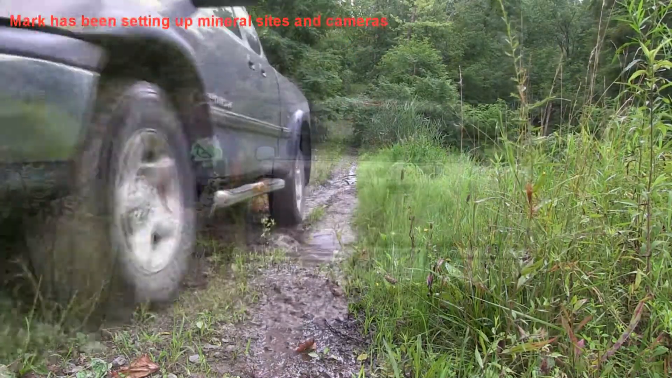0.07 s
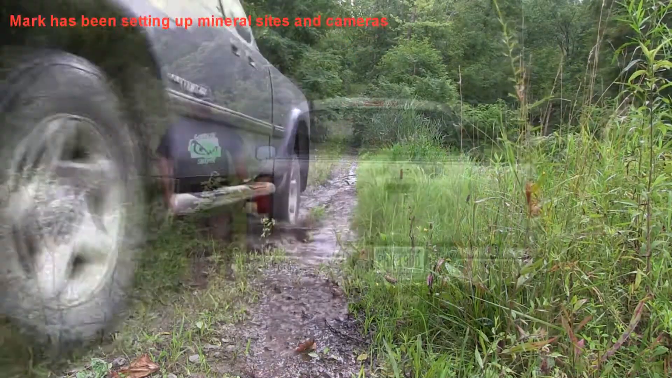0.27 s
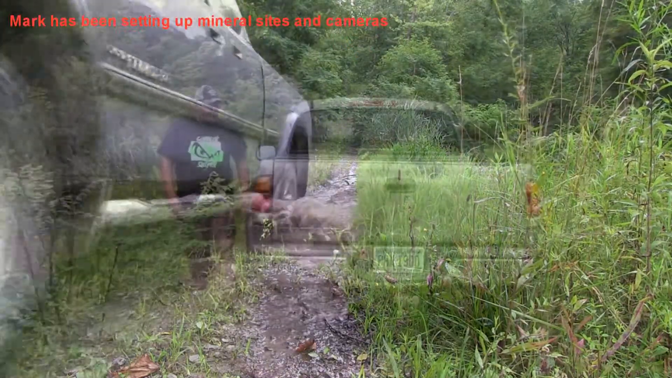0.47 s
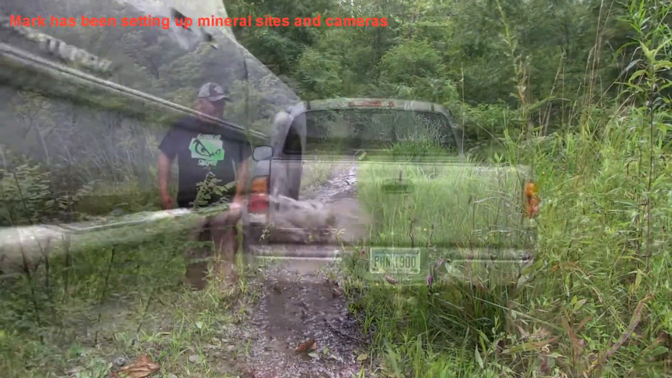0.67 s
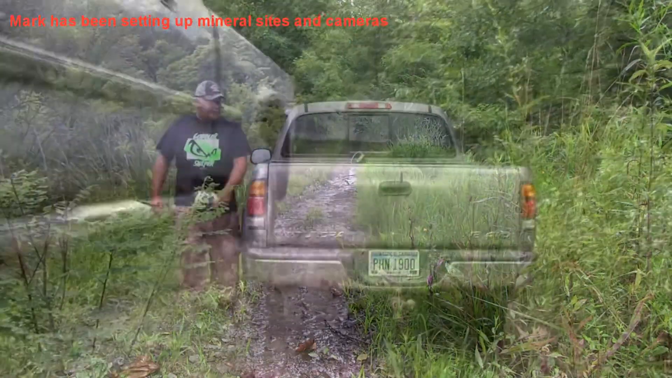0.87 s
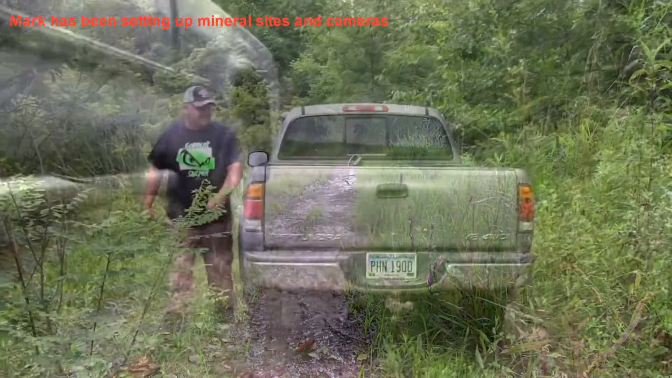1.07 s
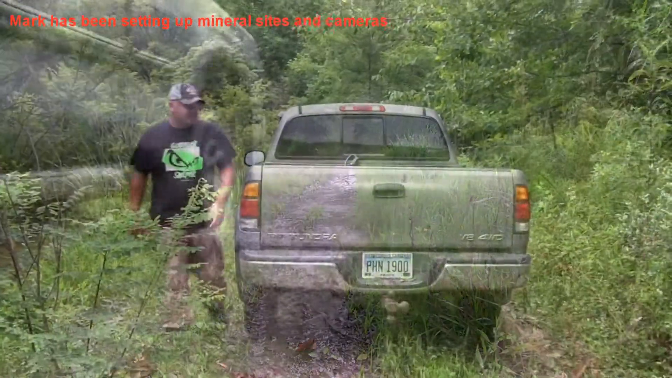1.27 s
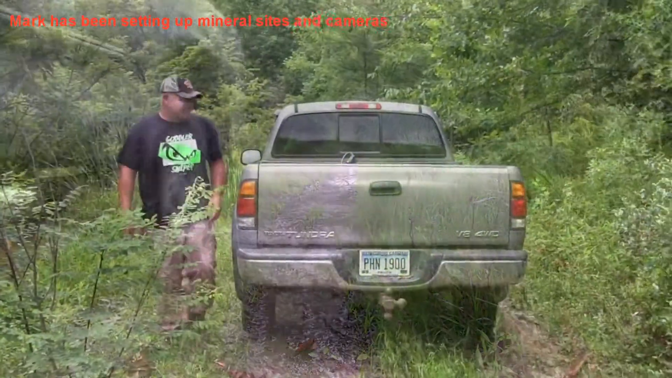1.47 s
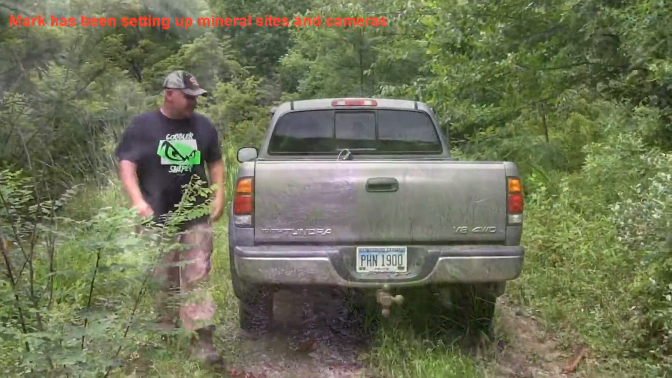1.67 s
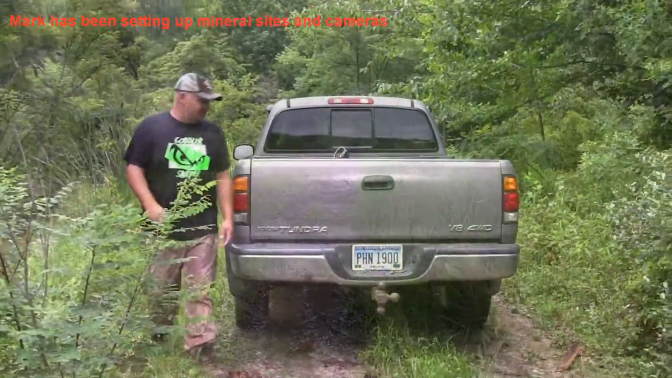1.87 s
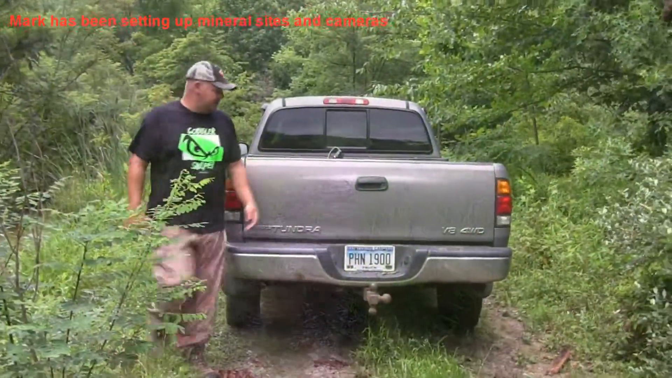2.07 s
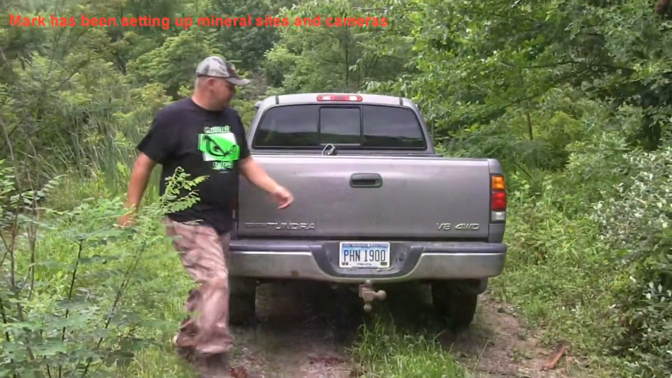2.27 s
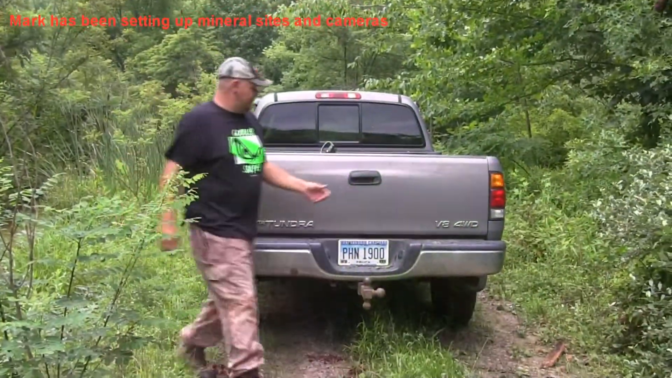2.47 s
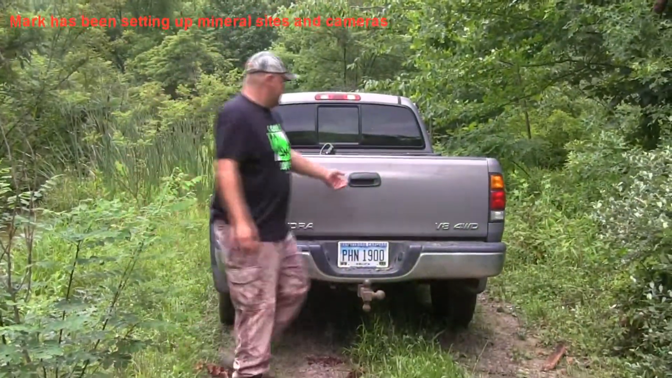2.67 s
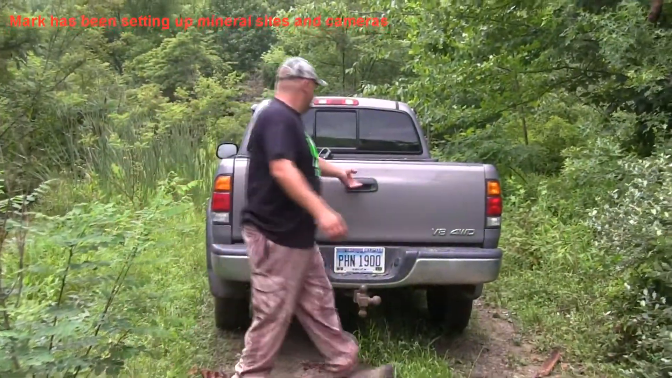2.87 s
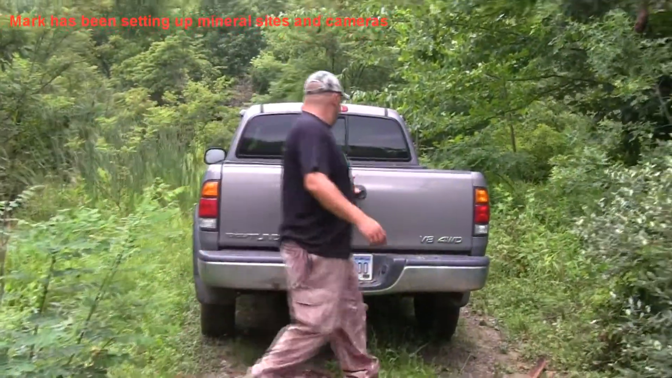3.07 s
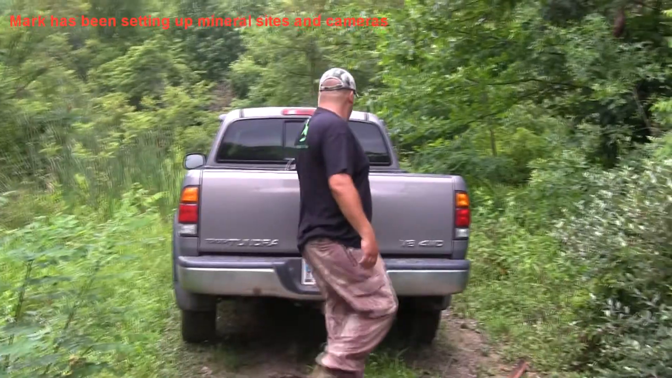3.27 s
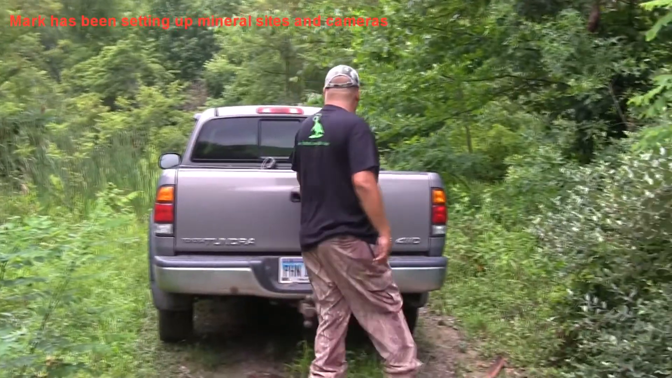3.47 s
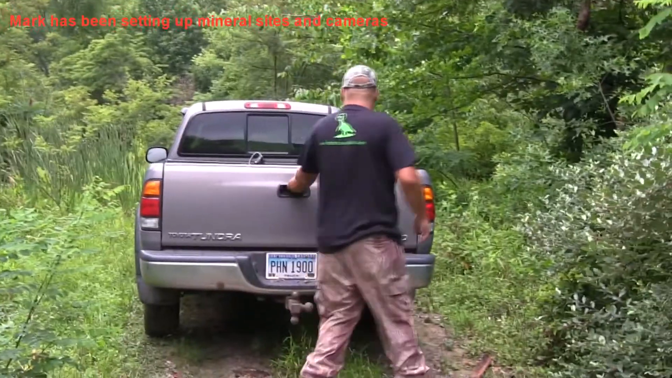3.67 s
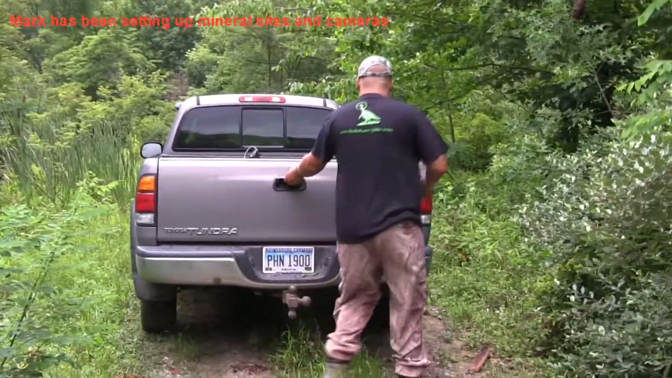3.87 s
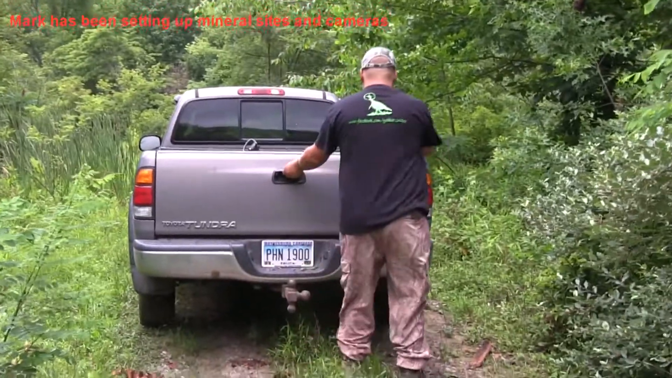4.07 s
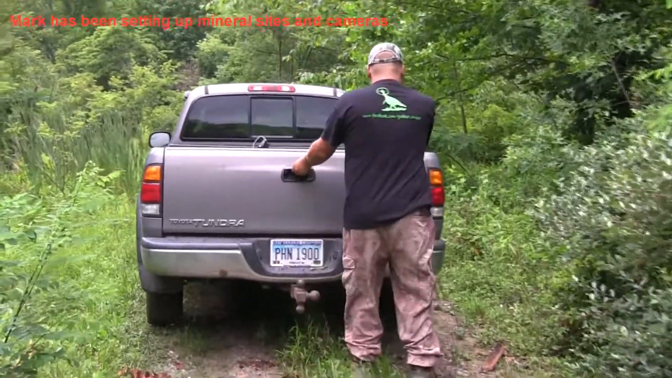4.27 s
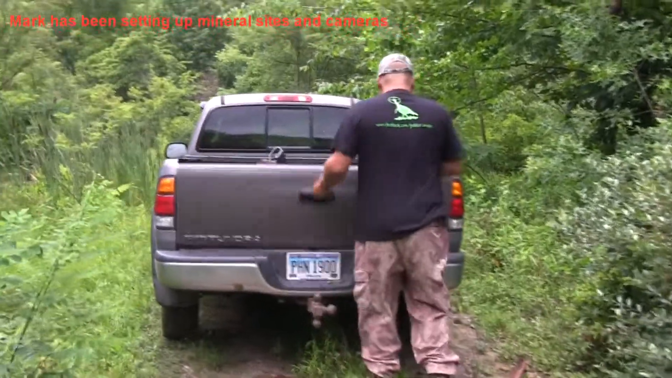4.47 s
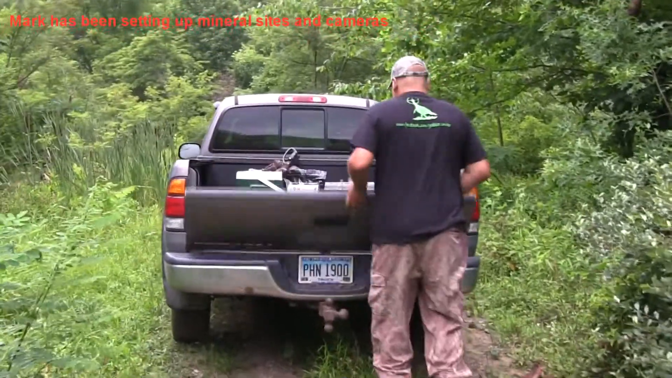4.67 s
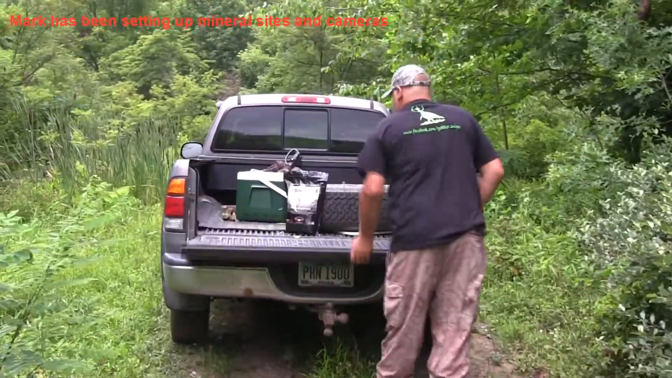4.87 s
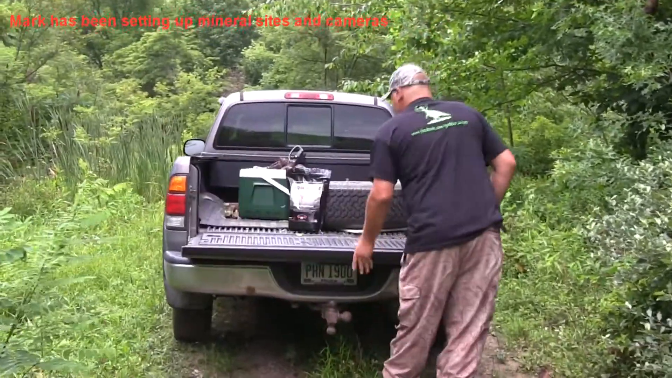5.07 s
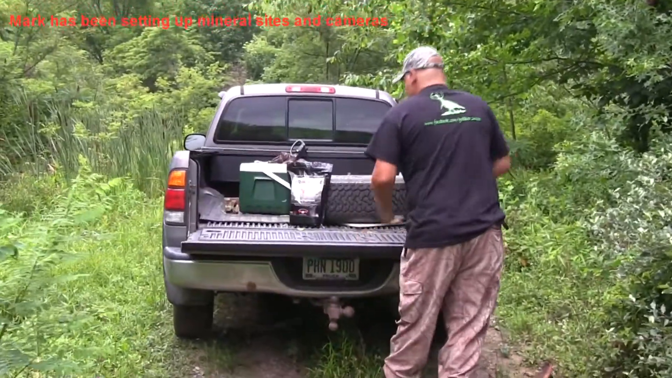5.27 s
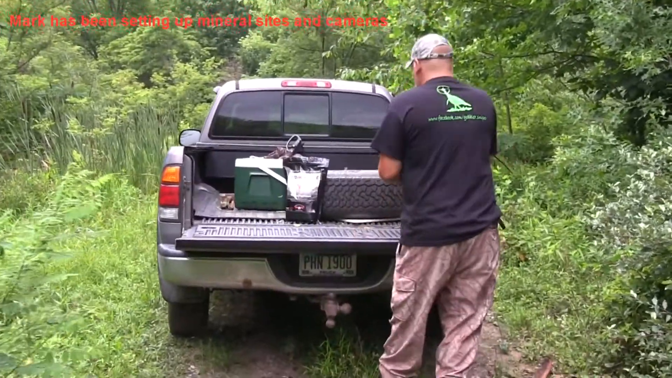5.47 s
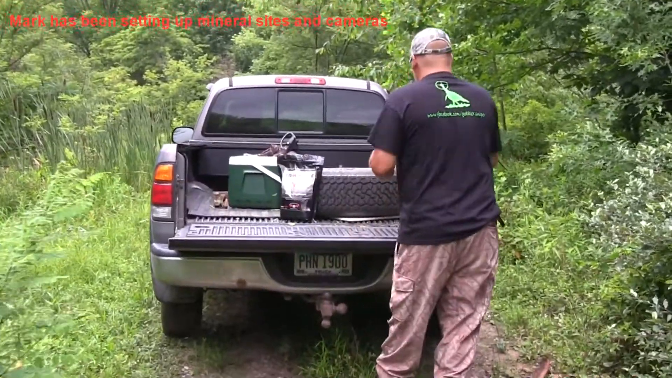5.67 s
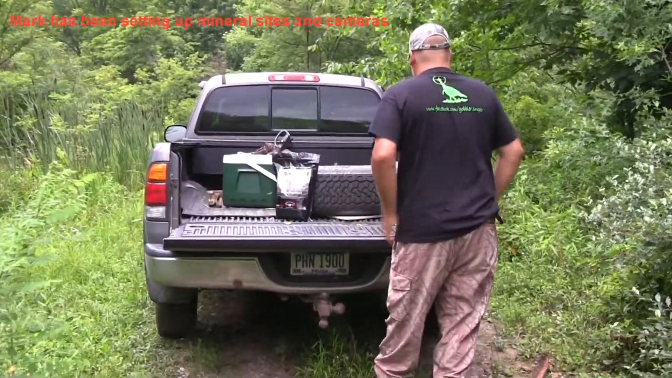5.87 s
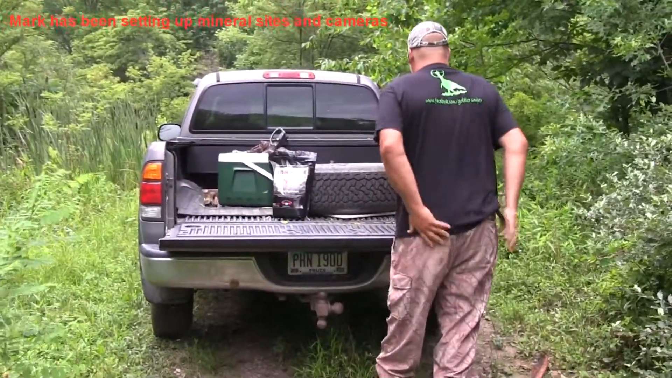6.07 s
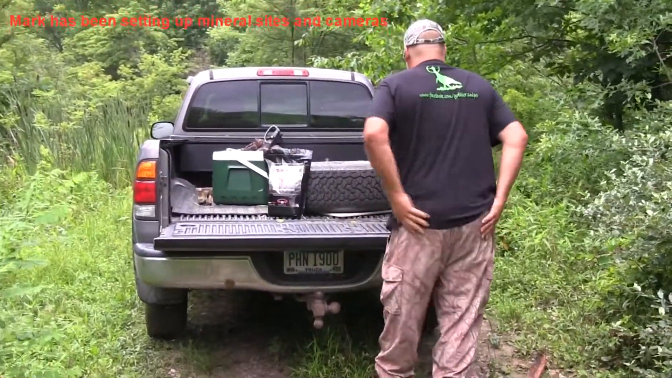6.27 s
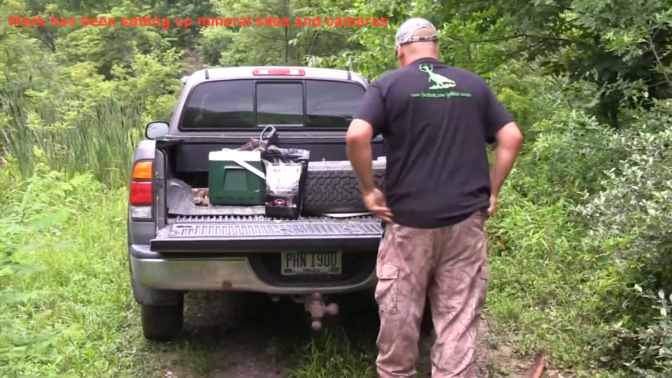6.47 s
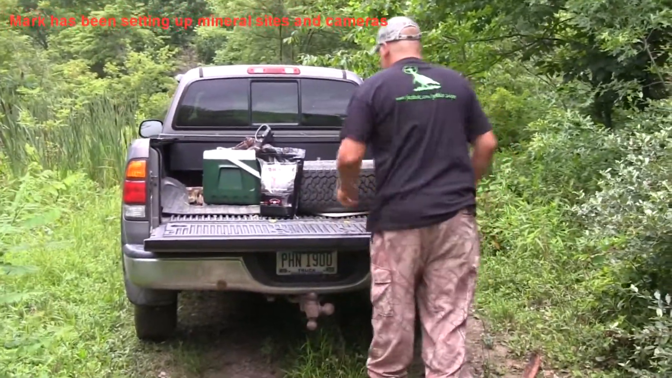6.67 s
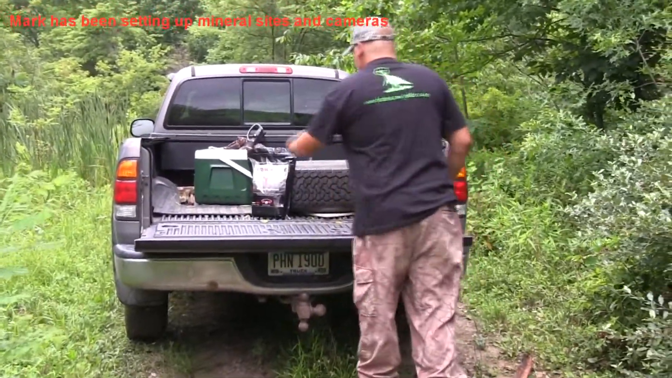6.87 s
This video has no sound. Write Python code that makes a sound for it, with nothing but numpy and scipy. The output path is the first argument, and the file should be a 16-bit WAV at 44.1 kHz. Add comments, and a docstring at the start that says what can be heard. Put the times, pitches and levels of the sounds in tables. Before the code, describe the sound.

A pickup passes close by on a wet gravel trail, tyres crunching and spraying, stones popping and stems whipping its body as the rumble and exhaust fade. Soft footsteps swish through weeds and a twig snaps. A steel tailgate unlatches with a clack, groans down and lands with a boom that rattles the load. A faint distant whistle and a few light pats on cloth follow against quiet woods.

```python
"""A pickup rolls past close by on a wet gravel trail: tyres crunch and spray, stones pop, stems whip the
body, and rumble and exhaust fade away by 3.3 s. A man steps through the weeds and snaps a twig.
At 4.4 s he unlatches the steel tailgate; it groans down, lands on its cables at 5 s with a boom
and shakes the load. A thin far whistle sounds, and at 6 s he pats his trousers. Quiet woods behind."""
import sys
import numpy as np
from scipy import signal
from scipy.io import wavfile
from scipy.ndimage import uniform_filter1d

SR = 44100
rng = np.random.default_rng(int(sys.argv[2]) if len(sys.argv) > 2 else 0)


def master(y):
    """Save y as 16-bit WAV."""
    cut = np.clip(np.atleast_2d(y).T, -1, 1)
    pcm = np.round(cut * 32767)  # scale
    wavfile.write(sys.argv[1], SR, pcm.astype(np.int16))


N = 305606
T = np.arange(N) / SR


# fader ride of the pass-by (time [s], level [dB])
PASS_BY = [(0, -23), (.55, -26), (1.15, -22), (1.55, -23), (1.9, -28.5), (2.1, -30), (2.5, -35.5),
           (2.9, -45.5), (3.3, -55)]
def truck():
    """The pickup passes close by and fades: rumble and exhaust to the right, spray a little left."""
    fader_db, on = levels(PASS_BY)
    return on * wheels(fader_db) + sides(-4.5) * (exhaust(fader_db) + hollow_ring())


# EQ of the three noise layers (frequency [Hz], level [dB])
CRUNCH_EQ = [(120, -21), (250, 0.5), (400, 1), (1400, -6.5), (2300, -14), (6000, -35), (9000, -57)]
SPRAY_EQ = [(1470, -6.5), (2500, 3), (7860, -1), (13800, -10), (15700, -14)]
RUMBLE_EQ = [(30, -30), (85, -6), (140, 2.5), (210, -6.5), (400, -8), (700, -57.5)]
# stereo image (frequency [Hz], correlation), (frequency [Hz], left lead [rad]), (frequency [Hz], pan [dB])
WHEEL_LIKENESS = [(60, 0.98), (240, 0.94), (950, 0.63), (3770, 0.079), (15000, 1)]
WHEEL_LEAD = [(0, -1.85), (1890, 1), (15400, -0.71)]
WHEEL_PAN = [(100, -4.5), (500, -1), (2000, 5), (12000, 1)]
# wetter and drier stretches of trail (start [s], length [s], crunch boost [dB], spray boost [dB])
PUDDLES = [(0.03, 0.34, 3.5, 0.5), (0.523, 0.11, 0.5, -4.5), (0.636, 0.38, 5.5, 2), (1.714, 0.3, 4, 6),
           (2.425, 0.14, 3, -1.5), (2.558, 0.23, 2, 5.5)]
def wheels(fader_db):
    """Tyres crunch gravel and throw spray while the underbody rumbles."""
    start, length, crunch_boost_db, spray_boost_db = np.transpose(PUDDLES)
    progress = np.clip((T - np.c_[start]) / np.c_[length], 0, 1)
    splash = np.sin(np.pi * progress ** 2.2).clip(0) ** 0.42  # slow build, flat top, fast stop
    rear = np.clip((T - 1) / 0.15, 0, 1)  # the rear axle passes at 1 s: less spray, more rumble
    crunch_db = fader_db + crunch_boost_db @ splash
    spray_db = fader_db - 3 - 6 * rear + spray_boost_db @ splash
    rumble_db = fader_db - 4 + 5 * rear + 0.2 * crunch_boost_db @ splash
    image = WHEEL_LIKENESS, WHEEL_LEAD, WHEEL_PAN
    crunch = hiss(CRUNCH_EQ, *image, 2.2, 1.2) + 0.45 * grains(260, 4.2, 500, 1900, cycles=2.5)
    spray = hiss(SPRAY_EQ, *image, 1.5, 1.1, size=256) + 0.28 * grains(900, 4.5, 2860, 13000, cycles=7)
    rumble = hiss(RUMBLE_EQ, *image, 1.2, 0.8, size=2048)
    # the front tyre's bright squelch fades as it rolls off
    crunch += gain_of(0.5 - 8.4 * T) * grains(2500, 1.05, 810, 3300, cycles=1.46)
    return gain_of(crunch_db) * crunch + gain_of(spray_db) * spray + gain_of(rumble_db) * rumble


# exhaust note (time [s], pitch [Hz], level against the fader [dB])
EXHAUST_NOTE = [(.6, 126.5, -10), (.78, 150.5, 3), (.88, 117.4, -1), (1.0, 123.3, 2.5), (1.17, 147.1, 8.5),
                (1.23, 134.9, 1), (1.3, 132.7, 9), (1.46, 137.9, 5), (1.6, 146, 3), (2.5, 136.4, -0.5)]
def exhaust(fader_db):
    """A breathy tone; the two cylinder banks fire unevenly, which adds a half order."""
    hz, note_db, running = levels(EXHAUST_NOTE)
    turns = np.cumsum(hz) / SR
    tone = np.sin(2 * np.pi * turns) + 0.086 * np.sin(np.pi * turns)
    breath = ring(rng.standard_normal(N), hz, width=36)
    return running * gain_of(fader_db + note_db) * (0.61 * evened(tone) + 0.11 * evened(breath))


# hollow pulses (start [s], hold [s], level [dB])
HOLLOW_PULSES = [(2.51, 0.025, -40.5), (2.669, 0.012, -34.5), (2.83, 0.027, -40.5), (2.98, 0.066, -46.5)]
def hollow_ring():
    """A narrow resonance sounds in short pulses under the departing truck."""
    tone = ring(rng.standard_normal(N), 330, width=8.7)
    steady = evened(tone / np.sqrt(uniform_filter1d(tone ** 2, size=3000) + 1e-6))  # pitch still wavers
    return swells(*np.transpose(HOLLOW_PULSES), rise_s=0.014, fall_db_per_s=190) * steady


# hits on the gate (time [s], clack peak [dB], clack pitch [Hz], panel level [dB], panel bass trim [dB],
# crack level [dB], crack centre [Hz], damping [factor])
GATE_HITS = [(4.42, -3, 1304, -13, -8, -8, 3050, 1.26), (4.622, -12, 1110, -15.5, -4.5, 2.5, 4000, 1.3),
             (5.638, -18.5, 2210, -24.5, -37, -12.5, 3320, 6.7)]
# latch ring (frequency [Hz], level against the clack [dB], t60 [s])
LATCH_MODES = [(2080, -20, 0.23), (3060, -31, 0.2)]
GATE_PAN_DB = -1.9
def gate_hits():
    """Steel strikes steel: a clack and a bright crack, then latch and panel ring on."""
    out, t = np.zeros(N), T[:SR // 2]
    attack = np.minimum(t / 0.003, 1)
    for s, db, hz, panel_db, bass_db, crack_db, crack_hz, damping in GATE_HITS:
        noise = rng.standard_normal(len(t))
        add(out, s + 0.00236, gain_of(db) * pop(hz, 6.5 / damping))
        # the crack is sharp, then loose parts buzz on more quietly
        crack_decay = gain_of(-60 * t / 0.026) + 0.14 * gain_of(-60 * t / 0.17)
        crack = gain_of(crack_db) * ring(noise, crack_hz, 4600) * crack_decay / 3
        struck = noise * (1 + 0.74 * np.exp(-t / 0.021))  # the blow, then the shiver of the steel
        body = gain_of(panel_db) * panel(struck, bass_db, damping * t)
        latch = sum(gain_of(db + mode_db - 60 * t / t60) * evened(ring(noise, mode_hz, 380))
                    for mode_hz, mode_db, t60 in LATCH_MODES)
        add(out, s, attack * (body + crack + latch))
    return sides(GATE_PAN_DB) * out


# groan, landing and bounces (start [s], hold [s], bass [dB], panel [dB], rattle [dB])
GATE_JOLTS = [(4.538, 0.17, -48, -47.5, -42.5), (4.746, 0.18, -47.5, -53, -52.5),
              (4.909, 0.052, -37, -42.5, -52), (5.004, 0.015, -11, -13, -15),
              (5.074, 0.036, -17.5, -22, -29), (5.126, 0.006, -29, -21.5, -45),
              (5.61, 0.092, -61, -78, -48)]
# rattle EQ (frequency [Hz], level [dB])
RATTLE_EQ = [(1290, -2), (2200, -7.5), (5390, -17.5), (7250, -18), (15700, -35)]
def gate_drop():
    """The gate groans down, lands and bounces; loose load knocks unevenly against the steel."""
    start, hold, bass_db, panel_db, rattle_db = np.transpose(GATE_JOLTS)

    def envelope(db, rise_s, fall_db_per_s):
        tail = swells(start, hold, db - 23.5, rise_s, fall_db_per_s=46.5)  # the steel hums on faintly
        return swells(start, hold, db, rise_s, fall_db_per_s) + tail + 1e-9

    bass = envelope(bass_db, 0.014, 110)
    body = envelope(panel_db, 0.026, 246)
    rattle = envelope(rattle_db, 0.024, 290)
    impacts = (rng.random(N) < 300 / SR) * rng.exponential(22, N)
    knocks = evened(1 + uniform_filter1d(impacts, size=100))
    steel = body * panel(knocks * rng.standard_normal(N), 20 * np.log10(bass / body), age_s=0)
    return sides(GATE_PAN_DB) * steel + rattle * np.sqrt(knocks) * ahead(RATTLE_EQ, 1.0, 0.66)


# mode clusters of the gate (frequency [Hz], nominal width [Hz], level [dB], t60 [s])
PANEL_MODES = [(147, 52, 7, 0.62), (246, 36, -5, 0.45), (404, 104, 6, 0.058), (518, 91, -0.5, 0.39),
               (797, 150, -0.5, 0.37), (1280, 220, 0, 0.32), (2060, 610, -12.5, 0.16),
               (2840, 1000, -36, 0.057)]
def panel(drive, bass_db, age_s):
    """The steel panel rings in clusters of modes, each dying at its own speed."""
    return sum(gain_of(db + bass_db * (hz < 300) - 60 * age_s / t60)
               * evened(ring(drive, hz, 1.75 * width)) for hz, width, db, t60 in PANEL_MODES) / 2


# low weight under the hits (time [s], level [dB], t60 [s])
GATE_BOOMS = [(4.423, -12, .3), (4.6245, -6, .1), (5.0125, 4, .17)]
def gate_booms(hz=159):
    """The whole gate swings like a drum skin."""
    out, t = np.zeros(N), T[:SR // 2]
    attack = 1 - np.exp(-t / 0.0053)
    for s, db, t60 in GATE_BOOMS:
        add(out, s, -gain_of(db - 60 * t / t60) * attack * np.sin(2 * np.pi * hz * t))
    return sides(GATE_PAN_DB) * out


# gravel pops (time [s], peak [dB], pitch [Hz], decay [cycles])
STONE_POPS = [(0.219, -3.5, 1550, 2.6), (.588, -2, 755, 1.1), (0.335, -13, 1320, 3.7),
              (0.706, -16, 1275, 9.3), (.932, -9, 557, 0.96), (0.95, -7.5, 720, 1),
              (0.954, -6.5, 240, 0.45), (1.794, -12.5, 1340, 2.3), (2.266, -29, 1040, 3.6),
              (2.309, -18, 1140, 1.4), (2.535, -14.5, 663, 1.1), (2.763, -18, 626, 0.35),
              (3.364, -31, 380, 0.68), (3.449, -36.5, 542, 6.7), (3.584, -34.5, 2010, 13),
              (3.62, -29, 890, 4), (4.162, -30.5, 926, 6.1), (4.274, -31, 232, 0.74)]
def stone_pops():
    """Stones and twigs pop under tyres and boots."""
    out = np.zeros((2, N))
    for s, db, hz, cycles in STONE_POPS:
        add(out, s, sides(-1.3) * gain_of(db) * pop(hz, cycles))
    return out


# bright flicks (time [s], peak [dB], centre [Hz], t60 [s])
STEM_WHIPS = [(0.948, -13, 13500, .012), (0.995, -18, 7500, 0.057), (1.111, -10, 9800, 0.047),
              (1.183, -19.5, 9700, .03), (1.22, -14, 9250, .05), (1.319, -13.5, 9200, 0.067),
              (1.415, -17.5, 9920, 0.033), (1.909, -27, 4440, .06), (2.263, -30, 5990, 0.044),
              (2.582, -24.5, 7300, 0.044), (3.16, -31, 3900, 0.034), (3.71, -31, 5930, 0.043),
              (4.016, -32, 10600, 0.011), (6.501, -31.5, 2850, 0.016)]
def stem_whips():
    """Wet stems whip the truck's body and the man's trousers."""
    out, t = np.zeros((2, N)), T[:5000]
    for s, db, hz, t60 in STEM_WHIPS:
        noise, scatter = rng.standard_normal((2, len(t)))
        ragged = noise * gain_of(4 * evened(uniform_filter1d(scatter, size=60)))  # drops fly off unevenly
        envelope = np.minimum(t / (0.05 * t60), 1) * gain_of(-60 * t / t60)
        burst = (ring(ragged, hz, 0.4 * hz) + 0.12 * ragged) * envelope
        add(out, s, sides(1.8) * gain_of(db) * burst / abs(burst).max())
    return out


# the break (time [s], level [dB], pan [dB]) and its ring (pitch [Hz], level [dB], decay [cycles])
TWIG_SNAPS = [(3.645, -7, 11)]
TWIG_MODES = [(710, -1, 0.4), (2500, -9.5, 2.4), (3860, -9.5, 2.1), (5500, -16, 4.7), (9500, -13, 2.2)]
def twig_snap():
    """A dry twig breaks and rings for a few cycles."""
    out = np.zeros((2, N))
    for s, db, pan_db in TWIG_SNAPS:
        for hz, mode_db, cycles in TWIG_MODES:
            add(out, s, sides(pan_db) * gain_of(db + mode_db) * pop(hz, cycles))
    return out


# footfalls (start [s], hold [s], swish [dB], thud [dB], rustle [dB])
FOOTFALLS = [(3.4, 0.11, -47.5, -49, -48.5), (3.557, 0.064, -35.5, -42.5, -47),
             (3.64, 0.053, -53, -39, -71), (4.04, 0.03, -65, -50, -55), (4.109, 0.0073, -43, -48, -51.5)]
# EQ of weeds and leaves (frequency [Hz], level [dB])
SWISH_EQ = [(150, -32), (250, -2), (526, 2.5), (1090, -3), (3000, -18), (6000, -64)]
LEAF_EQ = [(1300, -19), (2400, -2.5), (8000, -4), (13800, -13), (15700, -17)]
def footsteps():
    """Wet weeds swish and rustle round the boots over dull thuds."""
    start, hold, swish_db, thud_db, rustle_db = np.transpose(FOOTFALLS)
    swish = ahead(SWISH_EQ, 2.4, 1.9) + 0.5 * grains(400, 4.5, 446, 2500, cycles=4)
    thud = sides(-1.6) * evened(ring(rng.standard_normal(N), 146, width=59))
    rustle = ahead(LEAF_EQ, 1.5, 1.4)
    return (swish * swells(start, hold, swish_db, rise_s=0.032, fall_db_per_s=133)
            + thud * swells(start, hold, thud_db, rise_s=0.027, fall_db_per_s=150)
            + rustle * swells(start, hold, rustle_db, rise_s=0.022, fall_db_per_s=140))


# hand pats (time [s], peak [dB], length [s]) and their colour (frequency [Hz], width [Hz], level [dB])
HAND_PATS = [(6.015, -34.5, 0.05), (6.052, -36, 0.034), (6.072, -44, 0.02), (6.183, -31.5, 0.016),
             (6.201, -30, 0.01), (6.267, -29, 0.014)]
POCKET_MODES = [(495, 200, 11.5), (1008, 98, 5.5), (2100, 2600, 8)]
def trouser_pats():
    """Hands pat cloth and the pockets resonate."""
    out, t = np.zeros((2, N)), T[:4000]
    for s, db, length in HAND_PATS:
        attack = np.minimum(t / (0.29 * length), 1) ** 2
        touch = rng.standard_normal(len(t)) * attack * gain_of(-20 * t / length)
        pocket = sum(gain_of(mode_db) * evened(ring(touch, hz, width))
                     for hz, width, mode_db in POCKET_MODES)
        add(out, s, sides(-3.9) * gain_of(db) * pocket / abs(pocket).max())
    return out


def thicket_echoes(x, t60=0.033):
    """Scattered echoes from the truck and the bushes, different at each ear."""
    taps = rng.standard_normal((2, 12000)) * (rng.random((2, 12000)) < 0.05)
    taps = signal.lfilter([1, -0.9], [1, -0.6], taps * gain_of(-60 * T[:12000] / t60))  # thin the lows
    return signal.oaconvolve(x, taps / np.linalg.norm(taps[0]), axes=1)[:, :N]


def far_whistle(hz=2865):
    """One thin, distant note, perhaps a bird."""
    return swells([5.81], [0.14], [-62], rise_s=0.014, fall_db_per_s=190) * np.sin(2 * np.pi * hz * T)


# ambience EQ (frequency [Hz], level [dB])
WOODS_EQ = [(20, -45), (74, 1), (181, -4), (291, -8), (454, -5.5), (3110, -12), (10600, -22),
            (15700, -29.5)]
def woods():
    """A quiet bed of outdoor air."""
    return gain_of(-49.5) * ahead(WOODS_EQ, 0.47, 1.0, size=1024)


# stereo image in front (frequency [Hz], correlation)
FRONT_LIKENESS = [(60, 1), (380, 0.57), (2380, 0.57), (15000, 0.79)]
def ahead(eq, patchy_db, flicker_db, size=256):
    """Noise from almost straight ahead."""
    return hiss(eq, FRONT_LIKENESS, [(20, 0.023)], [(20, -1.5)], patchy_db, flicker_db, size)


def hiss(eq, likeness, lead, pan, patchy_db, flicker_db, size=512):
    """Stereo noise from random short-time spectra, with drifting patches and broadband flicker."""
    frames, hz = 4 * N // size + 5, np.fft.rfftfreq(size, 1 / SR)
    a, b, c, d, patches = rng.standard_normal((frames, len(hz), 5)).T
    patches = evened(uniform_filter1d(uniform_filter1d(patches, size=7, axis=0), size=7, axis=1))
    flicker = evened(uniform_filter1d(rng.standard_normal(frames), size=3))
    alike = np.clip(read(likeness, hz), -1, 1)[:, None]
    left = a + 1j * b
    right = (alike * left + np.sqrt(1 - alike ** 2) * (c + 1j * d)) * np.exp(-1j * read(lead, hz))[:, None]
    gain = gain_of(read(eq, hz)[:, None] + patchy_db * patches + flicker_db * flicker)
    spectra = np.array([left, right]) * gain * sides(read(pan, hz))[..., None]
    return evened(signal.istft(spectra, nperseg=size, noverlap=3 * size // 4)[1][:, :N])


def grains(per_s, spread_db, lo_hz, hi_hz, cycles, count=24):
    """Tiny pops of many pitches at random times and pans; a few are large."""
    out = np.zeros((2, N))
    for hz in np.geomspace(lo_hz, hi_hz, count):
        size = gain_of(spread_db * np.minimum(rng.exponential(1, N), 4))
        hits = size * (rng.random(N) < per_s / count / SR)
        out += sides(rng.normal(0, 2)) * signal.oaconvolve(hits, pop(hz, cycles))[:N]
    return evened(out)


def pop(hz, cycles):
    """A wavelet that rises fast and dies in a few cycles, peak 1."""
    turns = np.arange(round(16 * SR / hz)) * hz / SR
    wave = np.sin(2 * np.pi * turns) * turns * np.exp(-2 * turns / max(cycles, 0.5))
    return wave / abs(wave).max()


def ring(x, hz, width):
    """A steep resonance: shift hz down to zero, smooth and shift back, twice over."""
    turn = np.exp(2j * np.pi * np.cumsum(hz * np.ones(len(x))) / SR)
    pole = np.exp(-np.pi * width / SR)
    for _ in range(2):
        x = 2 * (turn * signal.lfilter([1 - pole], [1, -pole], x / turn)).real
    return x


def swells(start, hold, db, rise_s, fall_db_per_s):
    """Envelope of events that rise, hold and die away, added in power."""
    age = T - np.c_[start]
    attack = np.clip(age / rise_s, 0, 1) ** 2
    release_db = fall_db_per_s * np.maximum(age - rise_s - np.c_[hold], 0)
    return np.linalg.norm(attack * gain_of(np.c_[db] - release_db), axis=0)


def levels(rows):
    """Automation curves at every sample, and a gate that is open while they last."""
    s, *columns = np.transpose(rows)
    gate = np.clip(np.minimum(T - s[0] + 0.01, s[-1] - T) * 100, 0, 1)
    return [np.interp(T, s, column) for column in columns] + [gate]


def read(points, hz):
    """Looks up a curve on a log frequency axis."""
    knots_hz, value = np.transpose(points)
    return np.interp(np.log(hz + 1), np.log(knots_hz + 1), value)


def gain_of(db):
    """dB to gain."""
    return 10 ** (np.asarray(db) / 20)


def evened(x):
    """Scales to rms 1."""
    return x / np.sqrt(np.mean(x ** 2) + 1e-20)


def sides(pan_db):
    """Left and right gains; positive pans left."""
    return gain_of(np.multiply.outer([0.5, -0.5], pan_db * np.ones(1)))


def add(mix, s, sound):
    """Mixes a sound in at s seconds."""
    part = mix[..., round(s * SR):][..., :sound.shape[-1]]
    part += sound[..., :part.shape[-1]]


def scene():
    """Truck and man over the woods; knocks and pops get short echoes and a low cut."""
    hits = stone_pops() + stem_whips() + twig_snap() + gate_hits() + gate_drop() + gate_booms()
    background = woods() + far_whistle()
    low_cut = signal.butter(3, 82, "high", fs=SR, output="sos")
    hits = signal.sosfilt(low_cut, hits + gain_of(-7.5) * thicket_echoes(hits))
    return truck() + footsteps() + trouser_pats() + hits + background


def record(dry):
    """Soft saturation, then a steep high cut."""
    high_cut = signal.firwin(511, 15800, window=("kaiser", 9), fs=SR)
    return signal.oaconvolve(0.85 * np.tanh(dry), high_cut[None], "same")


dry = scene()
out = record(dry)
master(out)
```